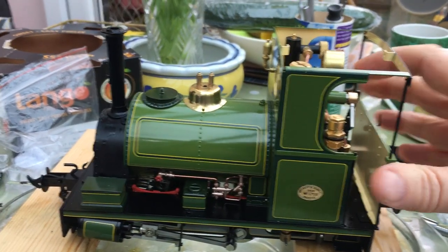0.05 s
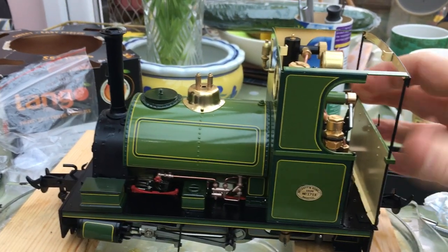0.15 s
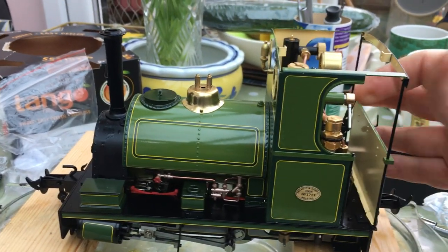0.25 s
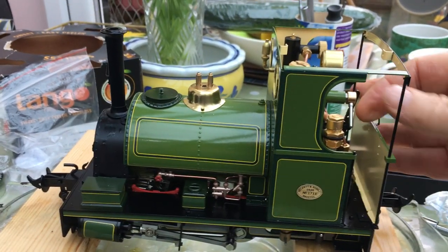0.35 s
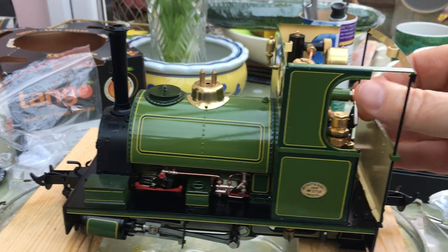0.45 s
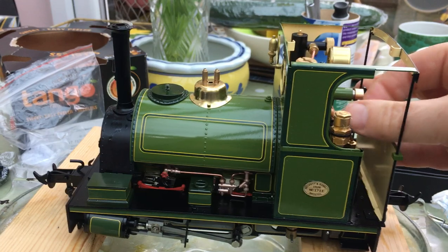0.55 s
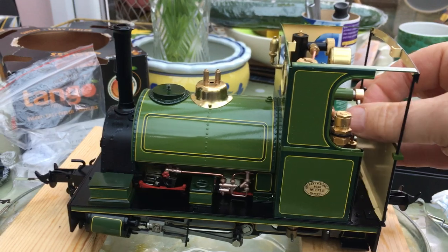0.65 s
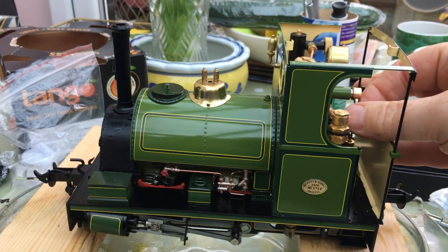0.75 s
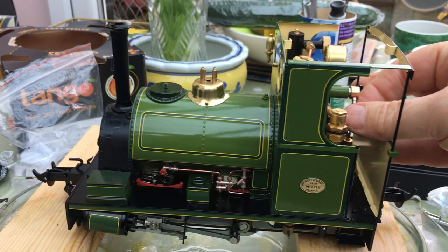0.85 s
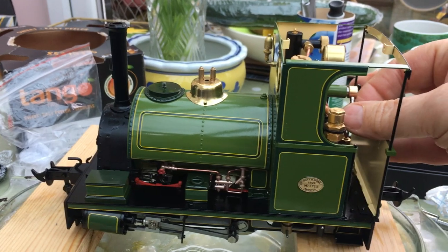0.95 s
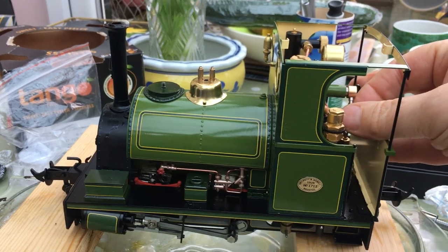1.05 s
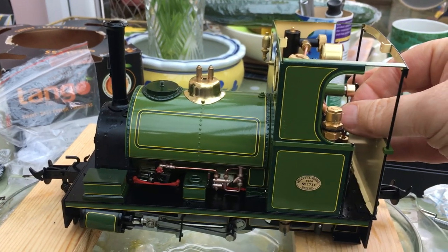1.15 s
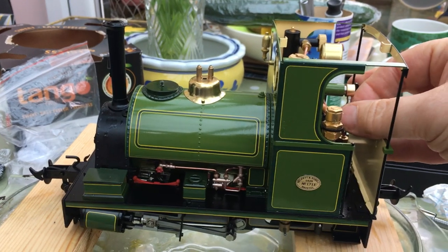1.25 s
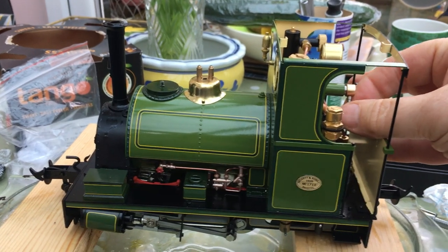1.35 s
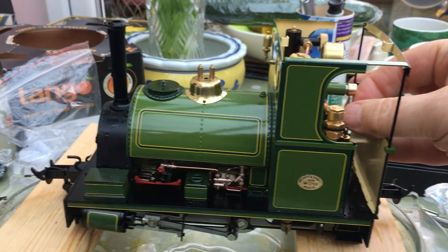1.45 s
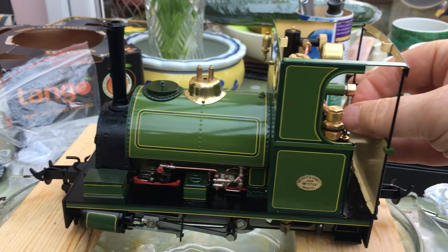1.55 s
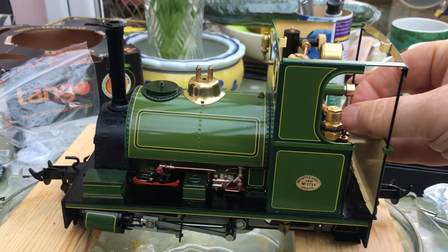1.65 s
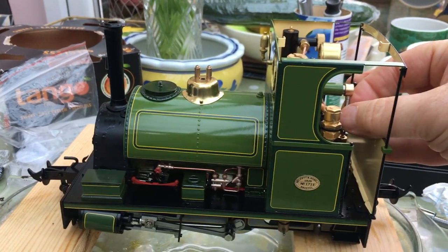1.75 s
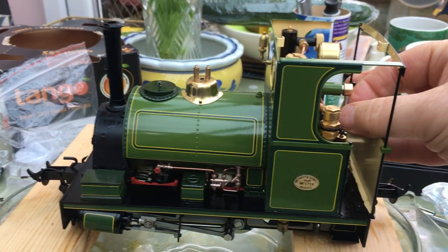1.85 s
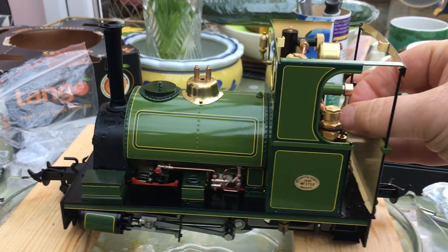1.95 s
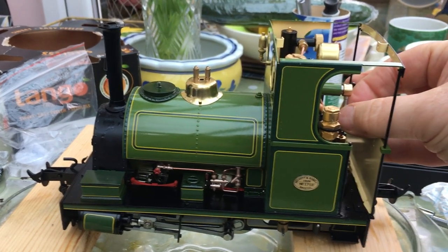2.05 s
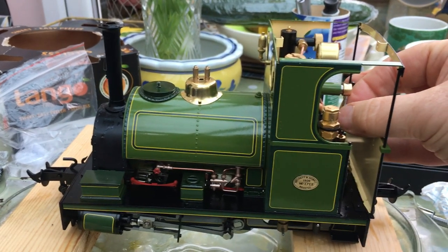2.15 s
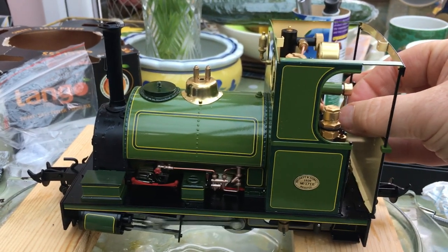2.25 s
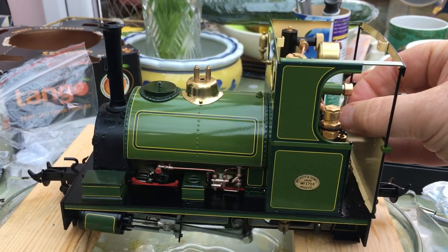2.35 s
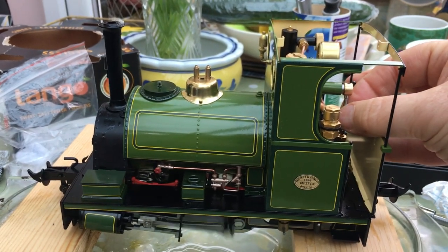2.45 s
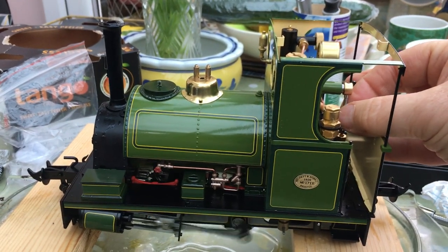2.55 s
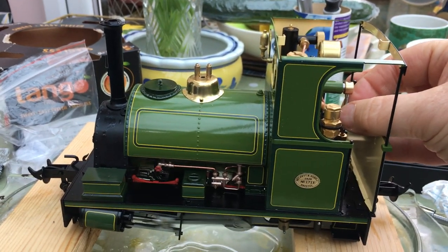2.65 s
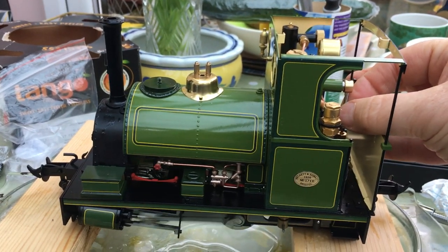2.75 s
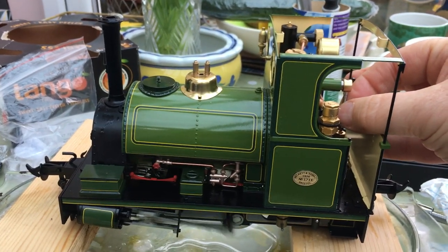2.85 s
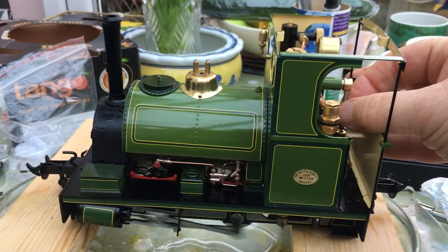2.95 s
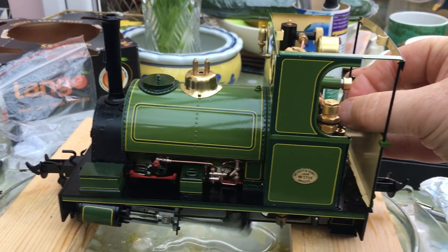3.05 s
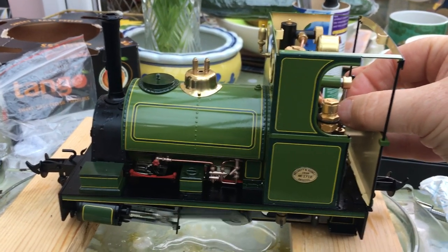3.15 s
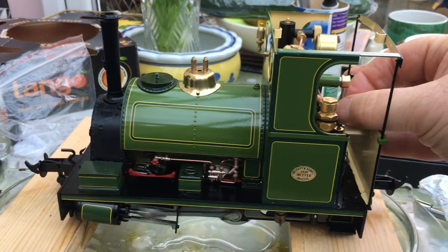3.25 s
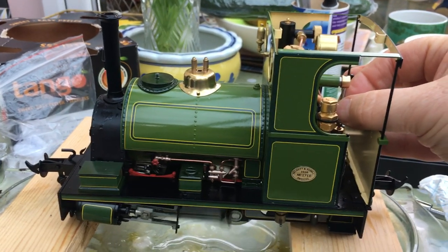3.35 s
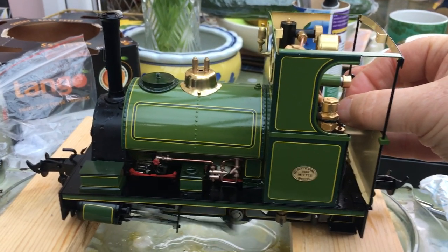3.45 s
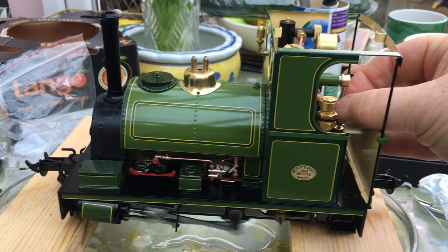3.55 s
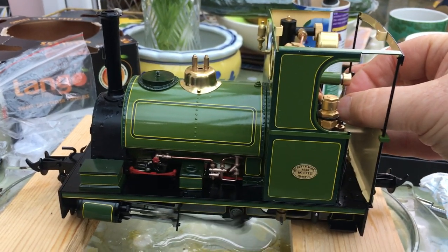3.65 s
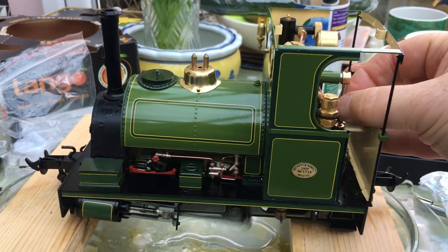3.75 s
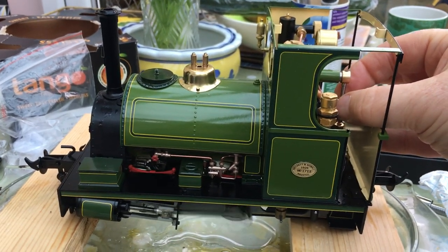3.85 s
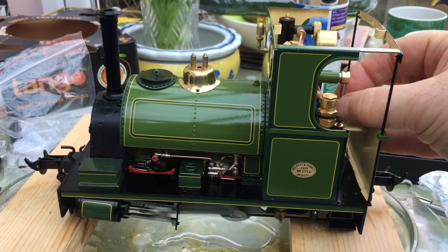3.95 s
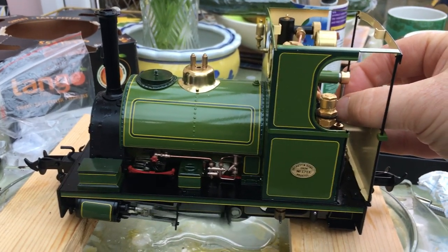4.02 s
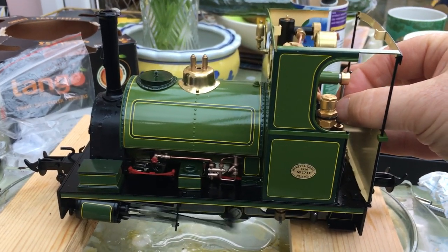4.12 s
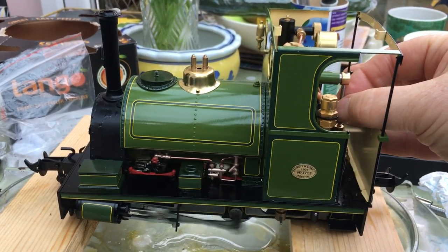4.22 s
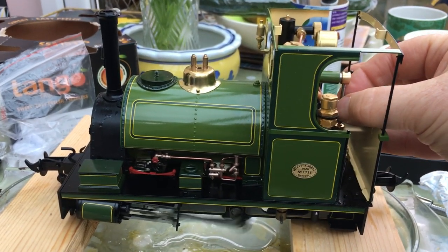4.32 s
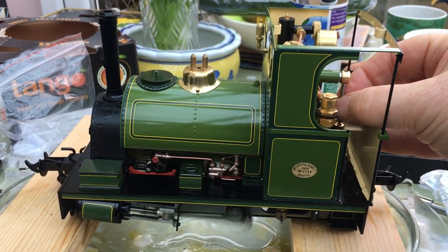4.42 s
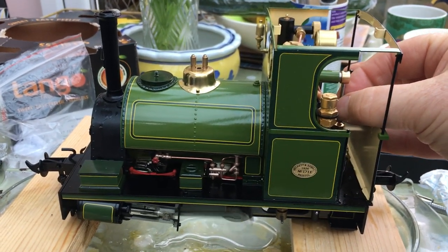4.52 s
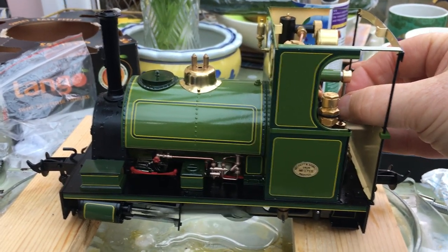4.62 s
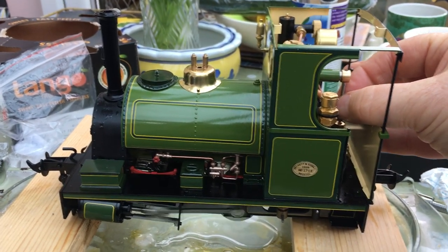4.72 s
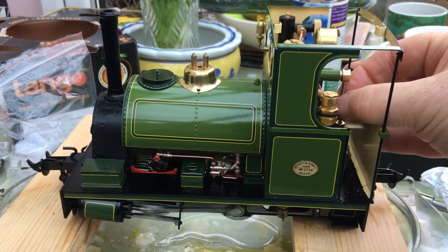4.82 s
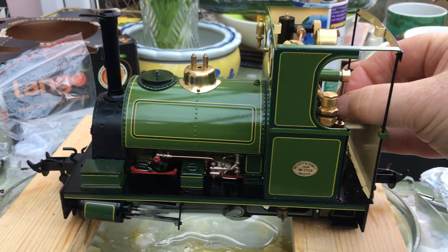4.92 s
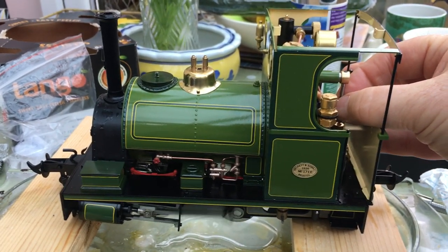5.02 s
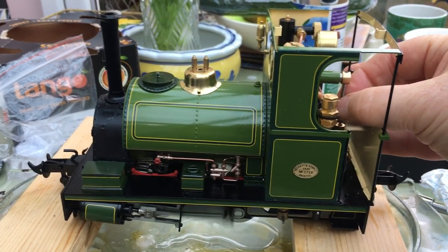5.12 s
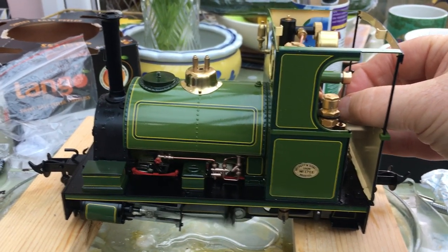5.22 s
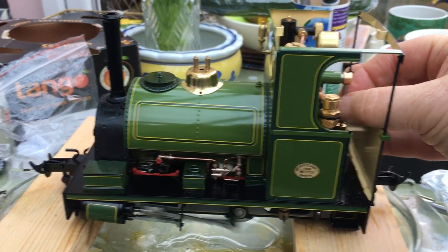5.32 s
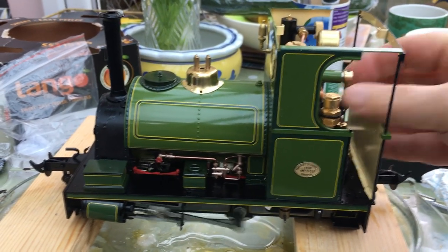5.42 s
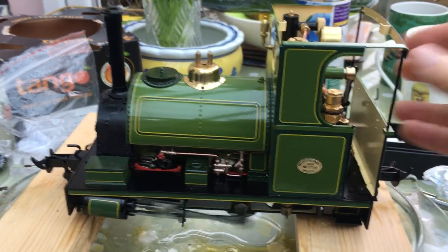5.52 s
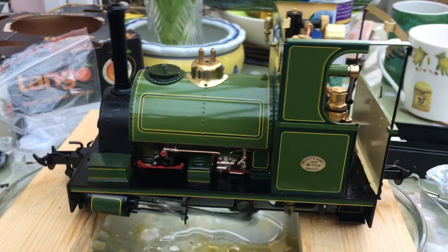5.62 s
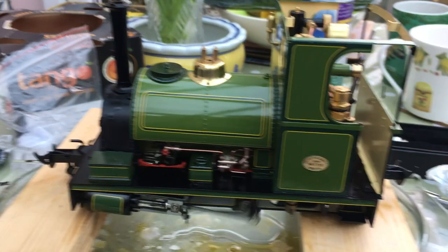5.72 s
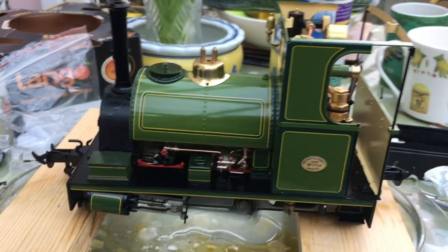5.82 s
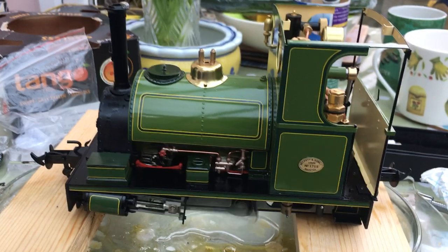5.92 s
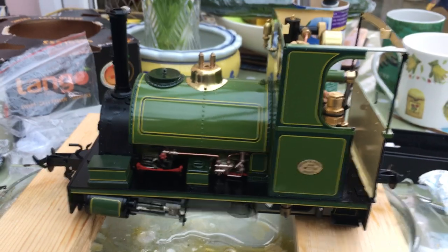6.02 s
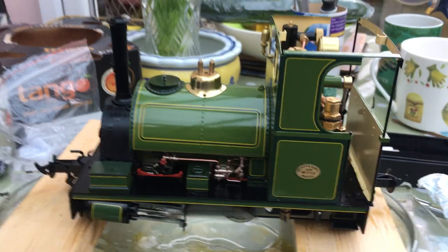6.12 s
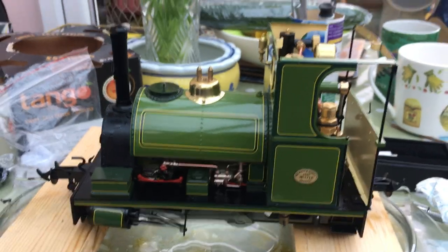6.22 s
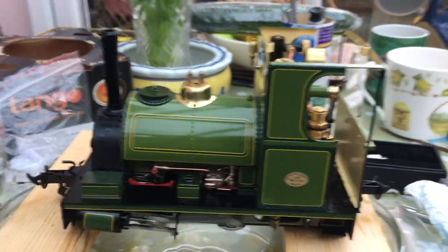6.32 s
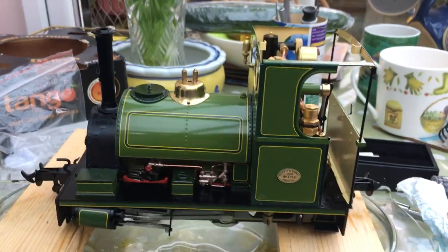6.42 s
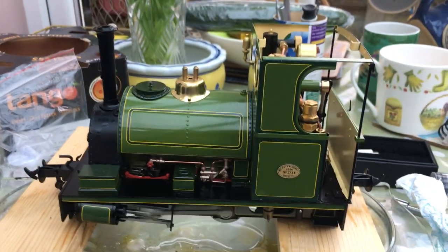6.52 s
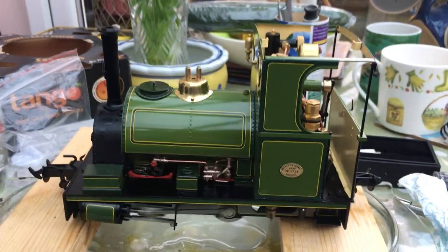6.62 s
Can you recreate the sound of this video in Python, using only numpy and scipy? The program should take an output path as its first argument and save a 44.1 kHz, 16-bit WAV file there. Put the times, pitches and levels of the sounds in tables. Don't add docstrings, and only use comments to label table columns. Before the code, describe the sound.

Close, single-microphone sound of a small steam model on blocks on a table. From 0 to 2.3 seconds there is only the gas burner: a steady, broad, slightly coloured hiss with a faint early sizzle and a soft low flame roar. At about 2.35 a sharp burst of steam breaks out, followed by uneven spits and loose metallic knocks. By 2.7 the wheels spin freely, about eight turns a second, soon rising to around nine. Four short, hissy puffs per turn merge into a rapid, even flutter. Rods knock in a repeating, dry, midrange clatter, with small parts rattling between blows, the boiler ringing faintly and the tabletop drumming low. Tiny bright taps come near 2.9, 3.25 to 3.3 and 4.5. From about 4 seconds the knocks are firmer and more regular, continuing at full pace over the hiss until it cuts off around 6.7.

```python
import sys
import numpy as np
from scipy import signal
from scipy.io import wavfile
from scipy.ndimage import uniform_filter1d

SR = 44100
rng = np.random.default_rng(int(sys.argv[2]) if len(sys.argv) > 2 else 0)


def convert_level_to_amplitude(level_db):
    exponent = np.asarray(level_db, float) / 20
    return 10 ** exponent


def persist_wave(psi):
    counts = np.round(np.clip(psi, -1, 1) * 32767).astype(np.int16)
    wavfile.write(sys.argv[1], SR, np.atleast_2d(counts).T)


N = 294588

# start_s [s], level_db [dB]
BURNER_LEVEL = [(0, -44), (.5, -44), (.8, -44.5), (2.3, -44.5), (4.5, -44.5), (6.68, -45.5)]
# pitch_hz [Hz], width_hz [Hz], level_db [dB]
FLUE_MODES = [(786, 230, -17), (1201, 70, -5.5), (1330, 87, -6.5), (1423, 55, -3.5), (1723, 270, -1),
              (2132, 420, -5.5), (2517, 69, -5.5), (2947, 210, -8.5), (3290, 520, -10), (3893, 430, -3),
              (4180, 44, -9.5), (4310, 39, -9.5), (4697, 200, -12.5), (5110, 61, -11), (5230, 91, -34),
              (5676, 404, -5.5), (6030, 440, -12.5), (6490, 140, -10.5), (6870, 170, -21), (7254, 700, -9),
              (7880, 270, -15.5), (8670, 600, -13.5), (9180, 390, -19.5), (9650, 210, -24),
              (9920, 570, -19.5), (10650, 110, -18), (10880, 230, -19), (11270, 270, -16.5),
              (12020, 470, -15), (12700, 790, -15), (13500, 310, -18.5), (14050, 250, -23),
              (14650, 300, -26), (14950, 300, -23), (15300, 340, -21), (15700, 300, -23)]
# pitch_hz [Hz], level_db [dB per Hz]
ROAR_SPECTRUM = [(15, -61), (25, -61), (47, -9.5), (81, -11.5), (130, -3), (210, -3), (285, -10),
                 (436, -15), (485, -23.5), (600, -17), (780, -27), (1320, -120)]
# start_s [s], angle_turns [turns]
WHEEL_TURNS = [(2.694, 1), (2.949, 3), (3.194, 5), (3.441, 7), (3.674, 9), (3.897, 11), (4.118, 13),
               (4.344, 15), (4.787, 19), (5.003, 21), (5.4265, 25), (5.6455, 27), (5.858, 29), (6.4885, 35),
               (6.6965, 37)]
# start_s [s], level_db [dB]
SHAKE_LEVEL = [(2.3, -14), (2.43, -2), (2.52, -5), (2.6, 1), (2.75, 2), (4, -0.5), (5, 0), (6.68, -.5)]
# start_s [s], load [0-1]
ROD_LOAD = [(2.7, 0.1), (3.6, 0.5), (4.05, 0.77), (4.7, 0.98), (5.3, 0.97), (6.1, 1), (6.68, 0.7)]
# [dB, upper over lower plate modes]
STROKES_PER_TURN = [(.097, -39.5, -36, -5.5), (.192, -32.5, -31, 0), (.342, -37, -29, -0.5),
                    (.452, -40.5, -33.5, -1.5), (.6, -58, -40.5, -3.5), (.672, -49, -31.5, -3),
                    (.7, -40, -45, 4), (.835, -34.5, -32.5, 3), (.9, -50, -42, -5)]
# frame_db [dB], plate_db [dB]
UNLOADED_LOSS = [(6, 12), (18, 9), (2, 6), (-5.5, -2.5), (6, 10), (-3, 1), (4, -4), (1.5, 9), (-3, -2)]
# start_s [s], frame_db [dB], plate_db [dB]
STRAY_KNOCKS = [(2.377, -47, -36), (2.39, -46, -33), (2.424, -37.5, -32), (2.469, -40, -41),
                (2.516, -53, -40), (2.553, -47.5, -41), (2.562, -55, -34), (2.59, -34.5, -33),
                (2.602, -38, -34), (2.633, -36, -36), (2.641, -45, -38), (2.651, -35, -37),
                (2.73, -34, -34), (2.892, -38, -41), (2.899, -45, -38), (2.975, -47, -40),
                (2.995, -38, -35), (3.24, -49, -38), (3.493, -41, -34), (4.5, -49, -40), (5.47, -52, -35)]
# start_s [s], level_db [dB]
PLATE_ACCENTS = [(2.881, 6.5), (3.005, -4), (3.127, -5), (3.484, -7), (3.937, 3), (4.044, 3.5),
                 (4.156, -1.5), (4.268, -12), (4.38, -4), (4.492, 3), (4.823, -1), (4.943, 3), (5.05, 2),
                 (5.145, 4), (5.251, 4), (5.463, 2), (5.684, 0), (6.314, -9), (6.42, 1), (6.523, 3)]
# start_s [s], level_db [dB]
VALVE_TAPS = [
    (2.881, -32),
    (3.249, -30),
    (3.254, -31),
    (3.292, -26),
    (4.492, -34),
]
# pitch_hz [Hz], width_hz [Hz], level_db [dB]
FRAME_MODES = [(906.6, 50, -2.5), (955, 80.3, 9.5), (1028, 69, 0.5)]
# pitch_hz [Hz], width_hz [Hz], level_db [dB]
PLATE_MODES = [(1280, 290, 1), (1420, 111, 7), (1574, 136, 3.5), (1759, 225, 16.5), (1870, 260, -14),
               (2160, 154, -1.5), (2570, 102, -1.5), (3134, 250, 1.5)]
# pitch_hz [Hz], width_hz [Hz], level_db [dB]
BOILER_MODES = [(340.4, 23, -6), (431, 30.5, -9), (532, 50, -7.5), (619, 43.4, -3.5), (716, 42, -5)]
# pitch_hz [Hz], width_hz [Hz], level_db [dB]
TABLE_MODES = [(77, 26, -3.5), (142, 36, -4.5), (190, 153, -4)]
# phase_turns [share of a turn], level_db [dB]
PORT_OPENINGS = [
    (.21, -2),
    (.45, -1.5),
    (.71, -5),
    (.96, -1.5),
]
# start_s [s], level_db [dB]
FIRST_PUFFS = [
    (2.348, 5),
    (2.38, -14),
    (2.408, -4),
    (2.471, 3.5),
    (2.556, 1),
    (2.582, -7),
    (2.608, 2),
    (2.641, -7),
    (2.675, 0),
]
# start_s [s], level_db [dB]
STEAM_LEVEL = [(2.7, -40.5), (3.2, -43.5), (3.8, -44.5), (4.4, -43.5), (5, -43), (5.6, -42.5), (6.1, -42.5),
               (6.68, -42)]
# pitch_hz [Hz], width_hz [Hz], level_db [dB]
CHIMNEY_MODES = [(2090, 270, -9.5), (2530, 470, -11), (3146, 260, -9.5), (3730, 140, -16), (4590, 330, -17),
                 (5800, 430, -12.5), (6140, 250, -27), (6330, 170, -9.5), (6580, 420, -4.5),
                 (7050, 200, -28), (7440, 210, -16.5), (9150, 610, -24), (9670, 470, -17.5),
                 (10060, 400, -21.5), (11500, 250, -14), (11800, 150, -23), (12340, 300, -17),
                 (12900, 320, -13.5), (13550, 300, -15), (14100, 300, -21), (15100, 300, -23),
                 (15550, 450, -23)]


def evened(x):
    return x / np.sqrt(np.mean(x ** 2) + 1e-20)


def column(rows, t, count):
    rows = np.array(rows)
    return np.interp(t, rows[:, 0], rows[:, count])


def peaks(modes, hz, steep=1.77):
    power = sum(convert_level_to_amplitude(db) ** 2 / (1 + (2 * (hz - f) / width) ** 2) ** steep for f, width, db in modes)
    return np.sqrt(power)


def drift(shape, frames, bins):
    z = uniform_filter1d(rng.standard_normal(shape), frames, 1)
    return evened(uniform_filter1d(z, bins, 0))


def noise(size, magnitude):
    hop = size // 4
    hz = np.fft.rfftfreq(size, 1 / SR)[:, None]
    t = np.arange(N // hop + 5) * hop / SR
    real, imag = rng.standard_normal((len(t), len(hz), 2)).T
    spectra = (real + 1j * imag) * magnitude(hz, t)
    return signal.istft(spectra, nperseg=size, noverlap=size - hop)[1][:N]


def burner():
    def jet(hz, t):
        patches_db = 0.7 * drift((len(hz), len(t)), frames=8, bins=12)
        fizz_db = 2 * np.exp(-t / 1.2) * np.exp(-((hz - 8700) / 1300) ** 2)
        low_db = np.interp(t, (2.3, 3.2), (-4, -1.5)) * np.clip((3200 - hz) / 800, 0, 1)
        return peaks(FLUE_MODES, hz) * convert_level_to_amplitude(patches_db + fizz_db + low_db)

    f, db = np.transpose(ROAR_SPECTRUM)
    roar = noise(4096, lambda hz, t: convert_level_to_amplitude(np.interp(np.log(hz + 1), np.log(f), db)) + 0 * t)
    flicker_db = 0.5 * drift((1, N), frames=300, bins=1)[0]
    level_db = column(BURNER_LEVEL, np.arange(N) / SR, count=1) + 6.43 + flicker_db
    return convert_level_to_amplitude(level_db) * evened(noise(1024, jet)) + convert_level_to_amplitude(-52.5) * evened(roar)


def knocks():
    slop_turns, frame_chance_db, plate_chance_db = 0.003, 1, 1.5
    s, turns = np.transpose(WHEEL_TURNS)
    share, frame_db, plate_db, colour_db = np.transpose(STROKES_PER_TURN)
    frame_loss, plate_loss = np.transpose(UNLOADED_LOSS)
    chance = rng.standard_normal((int(turns[-1]) - 1, len(share), 3))
    position = np.arange(1, turns[-1])[:, None] + share + slop_turns * chance[..., 0]
    at = np.interp(position, turns, s)
    slack = 1 - column(ROD_LOAD, at, count=1)
    frame_db = frame_db - frame_loss * slack + frame_chance_db * chance[..., 1]
    plate_db = (plate_db - plate_loss * slack + plate_chance_db * chance[..., 2]).ravel()
    when, accent_db = np.transpose(PLATE_ACCENTS)
    plate_db[abs(at.reshape(-1, 1) - when).argmin(0)] += accent_db
    pattern = np.transpose([at.ravel(), frame_db.ravel(), plate_db, (colour_db + 0 * at).ravel()])
    strays = np.pad(STRAY_KNOCKS, ((0, 0), (0, 1)))
    rows = np.vstack([strays, pattern])
    return rows[np.argsort(rows[:, 0])].T


def ring(at, level_db, modes, rise, spread_db, scatter, colour_db=0):
    t, out = np.arange(4000) / SR, np.zeros(N)
    chance = rng.standard_normal((len(at), len(modes), 2))
    at = at + .001 * (rng.random(len(at)) - .5)
    for k, (hz, width, db) in enumerate(modes):
        late = at + scatter * chance[:, k, 1] / hz - 1.608 * rise
        late = np.clip(late, 0, N / SR)
        tilt_db = np.sign(hz - 1570) * colour_db
        blow_db = level_db + db + tilt_db + spread_db * chance[:, k, 0]
        train = np.zeros(N + 400)
        np.add.at(train, (late * SR).astype(int), convert_level_to_amplitude(blow_db))
        swell = np.sin(np.pi / 2 * np.minimum(t / (2 * rise), 1)) ** 2
        tone = swell * np.exp(-np.pi * width * t) * np.sin(2 * np.pi * hz * t)
        out += signal.oaconvolve(train, tone)[:N]
    return out


def rattle(at, when, size, angle, shake_db):
    calm_db = -9 * np.exp(4 * (np.cos(angle) - 1))
    slack = 1 - column(ROD_LOAD, when, count=1)
    calm_db -= 6 * slack * np.exp(3 * (np.cos(angle - 1.2) - 1))
    since = when - at[np.maximum(np.searchsorted(at, when) - 1, 0)]
    settle_db = 2.5 - 280 * np.clip(since, 0, .025)
    level_db = -51 + 1.1 * shake_db + calm_db + settle_db - 8.2 * size
    out = ring(when, level_db - 3.0, FRAME_MODES, rise=0.002494, spread_db=7, scatter=0.36)
    return out + ring(when, level_db + 3.5, PLATE_MODES, rise=0.001494, spread_db=4.0, scatter=0.35)


def boiler_shell(when, size, angle, shake_db):
    swing_db = 1.5 * np.cos(angle - 2.6)
    level_db = -48 + 0.73 * shake_db + swing_db - 8.1 * size
    return ring(when, level_db, BOILER_MODES, rise=0.003075, spread_db=3, scatter=0.15)


def rods():
    at, frame_db, plate_db, colour_db = knocks()
    out = ring(at + 0.00138, frame_db + 2.5, FRAME_MODES, rise=0.00267, spread_db=0.5, scatter=0.067)
    out += ring(at, plate_db - 1.5, PLATE_MODES, rise=0.001488, spread_db=2, scatter=0.2, colour_db=colour_db)
    tap, tap_db = np.transpose(VALVE_TAPS)
    out += ring(tap, tap_db, PLATE_MODES[-3:], rise=0.00101, spread_db=1, scatter=.1)

    when, size = rng.random((3000, 2)).T
    when = 2.325 + when * (N / SR - 2.33)
    s, turns = np.transpose(WHEEL_TURNS)
    angle = 2 * np.pi * (np.interp(when, s, turns, left=.4) - .98)
    shake_db = column(SHAKE_LEVEL, when, count=1)
    out += rattle(at, when, size, angle, shake_db)
    return out + boiler_shell(when, size, angle, shake_db)


def table():
    t = np.arange(N) / SR
    s, turns = np.transpose(WHEEL_TURNS)
    throb = 1 + 0.52 * np.cos(2 * np.pi * (4 * np.interp(t, s, turns) - .8))
    drum = evened(noise(2048, lambda hz, frames: peaks(TABLE_MODES, hz, steep=2.26) + 0 * frames))
    level_db = -53.5 + 0.44 * column(SHAKE_LEVEL, t, count=1)
    fade_in = np.clip((t - 2.33) / 0.098, 0, 1)
    return convert_level_to_amplitude(level_db) * throb * fade_in * drum


def exhaust():
    s, turns = np.transpose(WHEEL_TURNS)
    puffs = []
    for turn in range(1, int(turns[-1])):
        for share, db in PORT_OPENINGS:
            puffs.append((np.interp(turn + share, turns, s), db))
    puffs = np.array(puffs)
    puffs += rng.standard_normal(puffs.shape) * [.0015, 1.1]
    at, puff_db = np.vstack([FIRST_PUFFS, puffs]).T
    train = np.zeros(N)
    train[np.minimum(at * SR, N - 1).astype(int)] = convert_level_to_amplitude(puff_db + column(STEAM_LEVEL, at, count=1))
    t = np.arange(SR // 10) / SR
    puff = (1 - np.exp(-(t / 0.0016) ** 2)) * np.exp(-t / 0.024)
    flow = signal.oaconvolve(train, puff)[:N]

    def gusts(hz, t):
        return peaks(CHIMNEY_MODES, hz) * convert_level_to_amplitude(0.83 * drift((len(hz), len(t)), frames=4, bins=30))

    steam = evened(noise(1024, gusts))
    chimney_band = signal.butter(2, (5000, 8000), "band", fs=SR, output="sos")
    note = signal.sosfilt(chimney_band, steam)
    mean = flow[3 * SR:].mean()
    soft = mean * (flow.clip(0) / mean) ** 0.89
    return convert_level_to_amplitude(5.0) * (flow * note + soft * (steam - note))


def scene():
    return np.tile(burner() + rods() + table() + exhaust(), (2, 1))


def low_pass(x):
    return signal.sosfilt(signal.butter(12, 15730, fs=SR, output="sos"), x)


def record(dry):
    heard = signal.sosfilt(signal.butter(2, 45, "high", fs=SR, output="sos"), dry)
    return low_pass(heard)


dry = scene()
out = record(dry)
persist_wave(out)
```